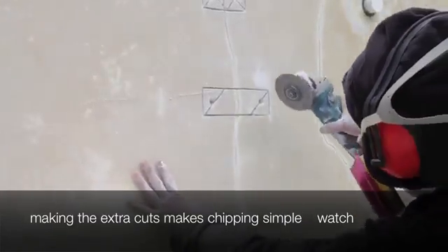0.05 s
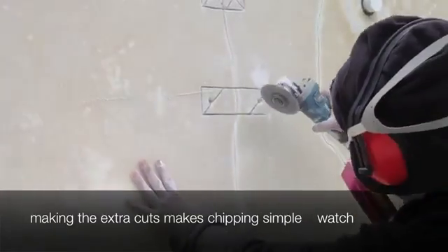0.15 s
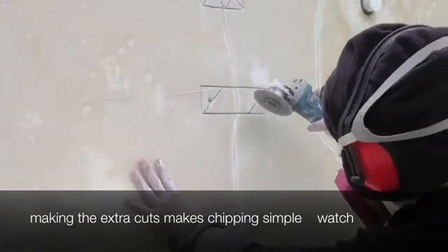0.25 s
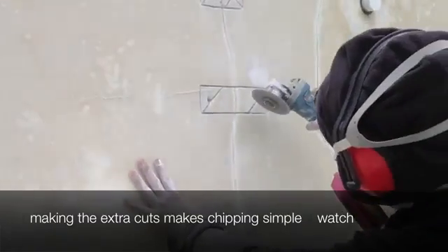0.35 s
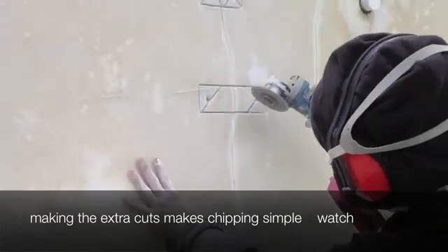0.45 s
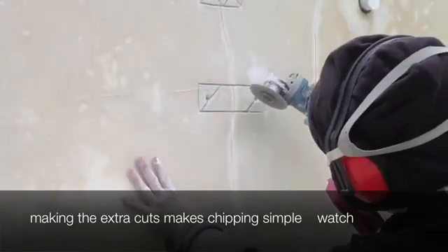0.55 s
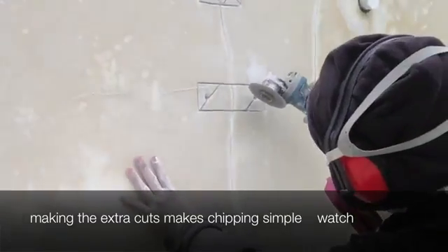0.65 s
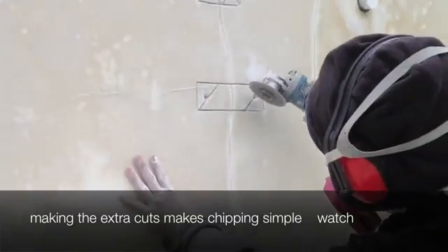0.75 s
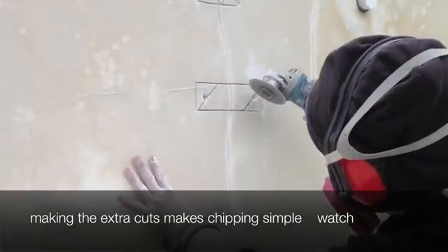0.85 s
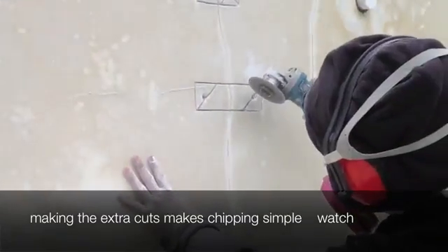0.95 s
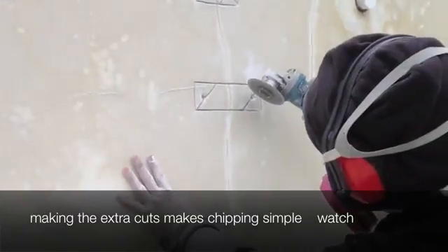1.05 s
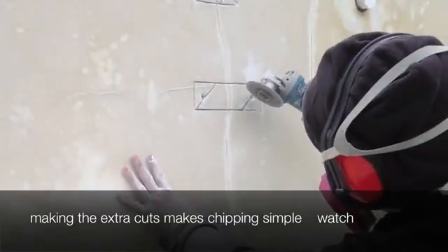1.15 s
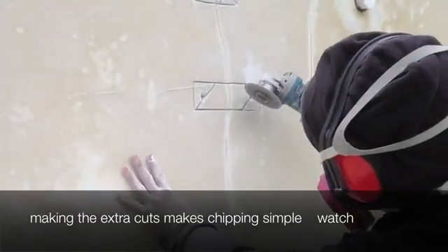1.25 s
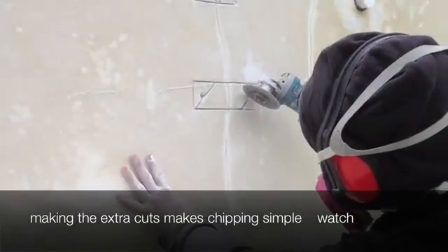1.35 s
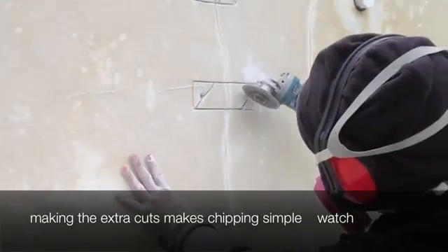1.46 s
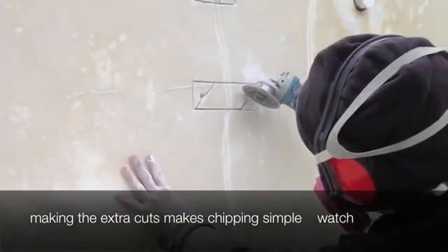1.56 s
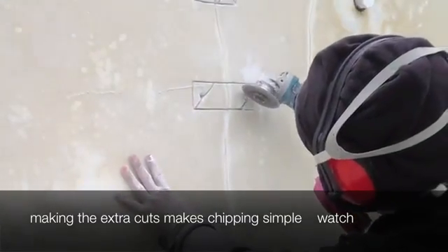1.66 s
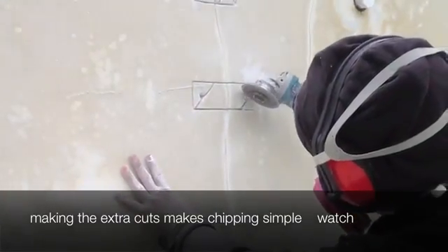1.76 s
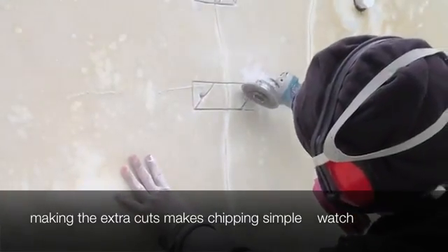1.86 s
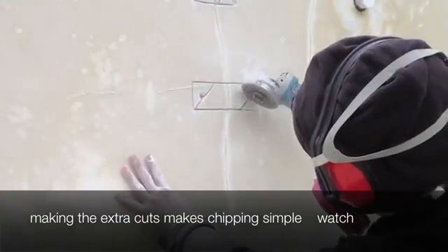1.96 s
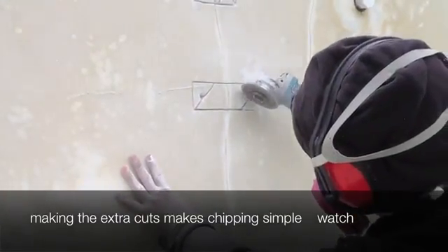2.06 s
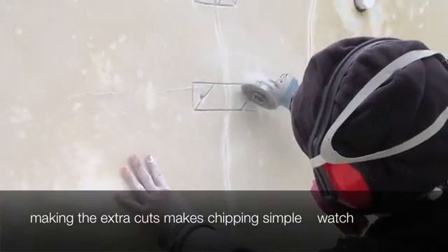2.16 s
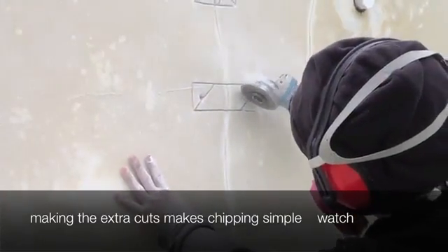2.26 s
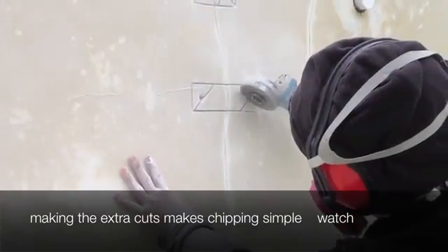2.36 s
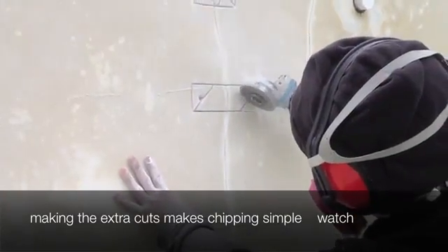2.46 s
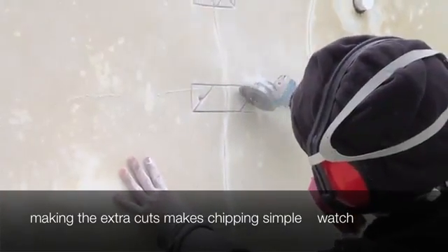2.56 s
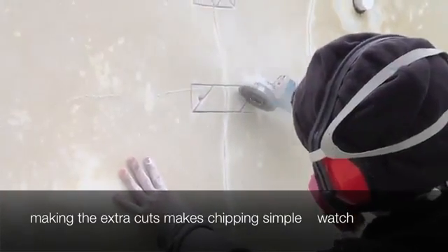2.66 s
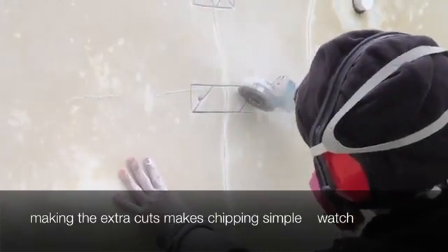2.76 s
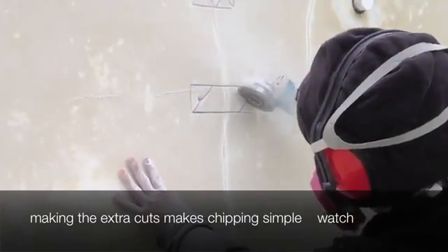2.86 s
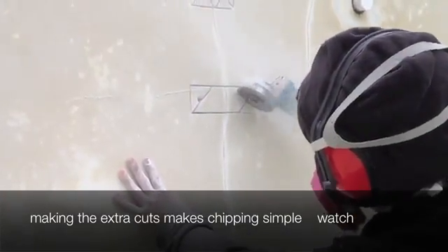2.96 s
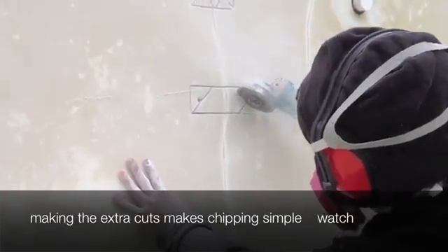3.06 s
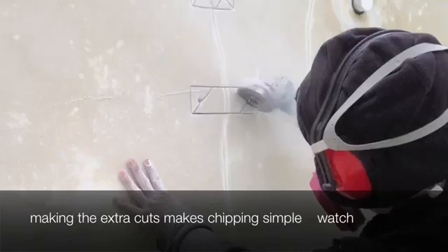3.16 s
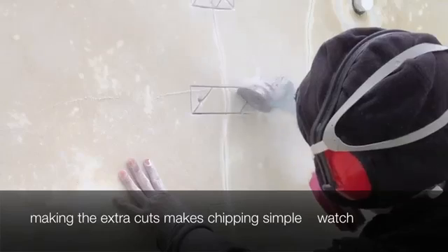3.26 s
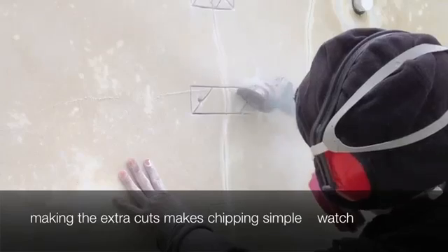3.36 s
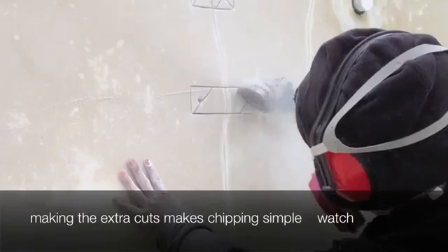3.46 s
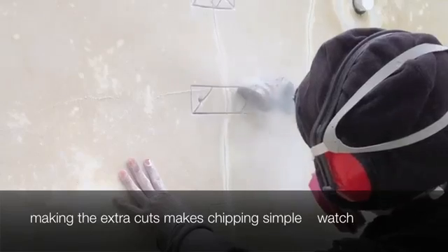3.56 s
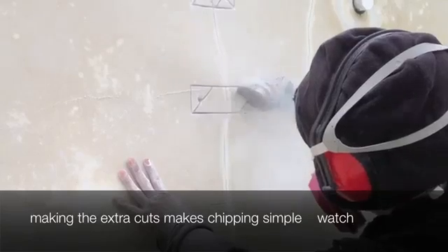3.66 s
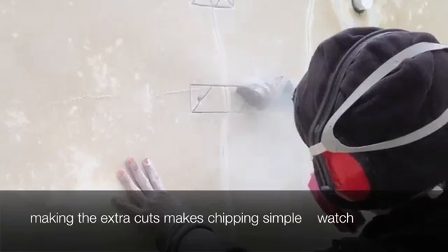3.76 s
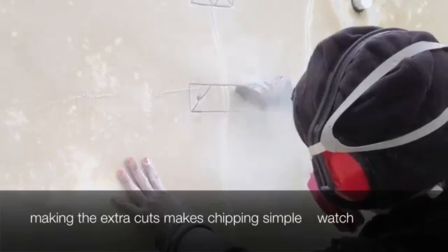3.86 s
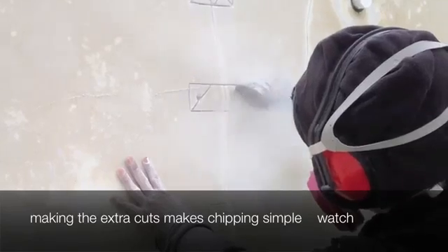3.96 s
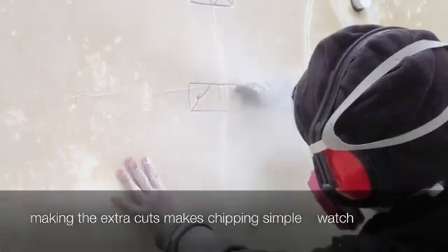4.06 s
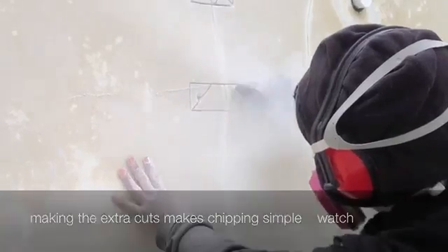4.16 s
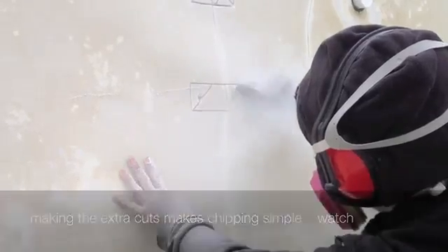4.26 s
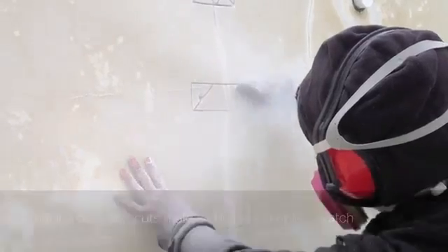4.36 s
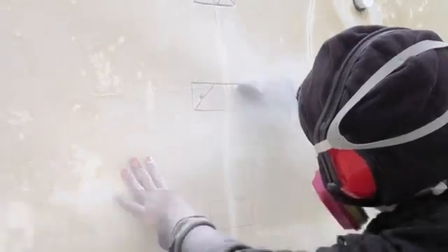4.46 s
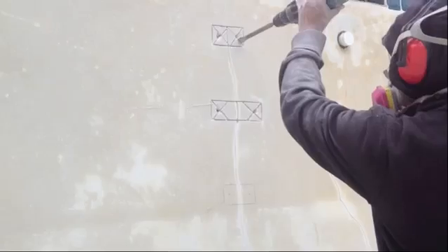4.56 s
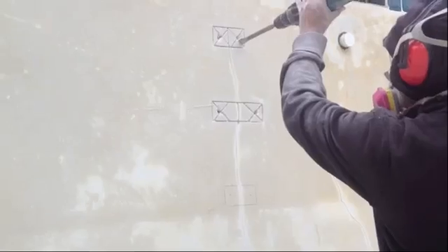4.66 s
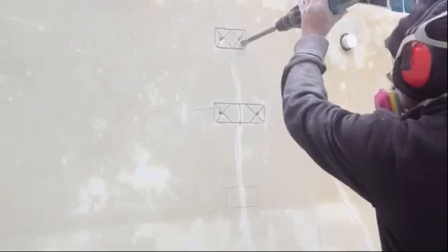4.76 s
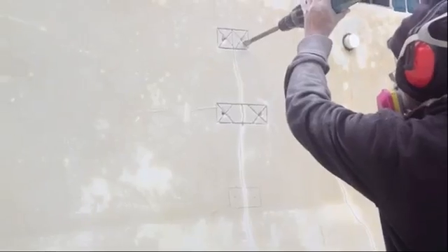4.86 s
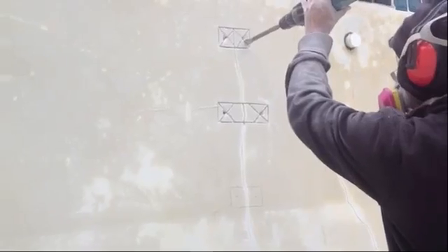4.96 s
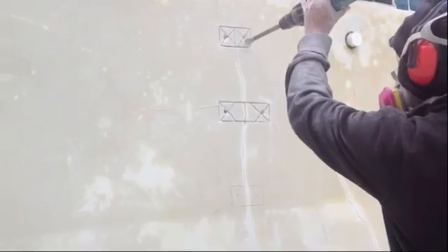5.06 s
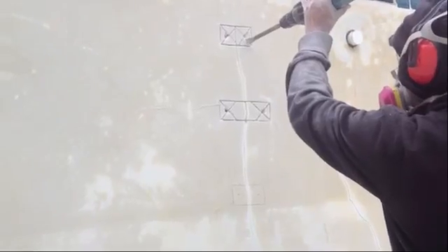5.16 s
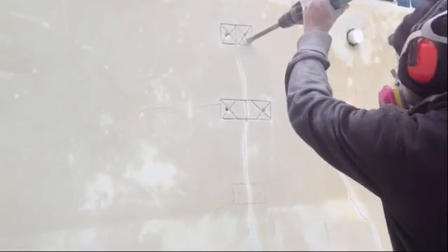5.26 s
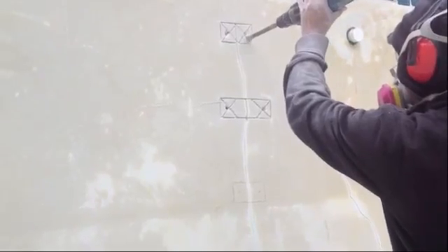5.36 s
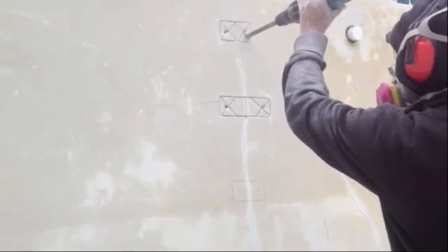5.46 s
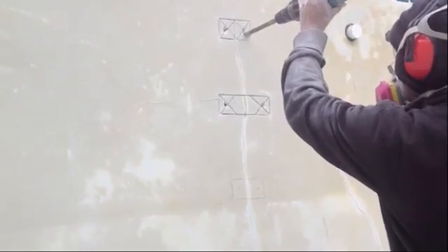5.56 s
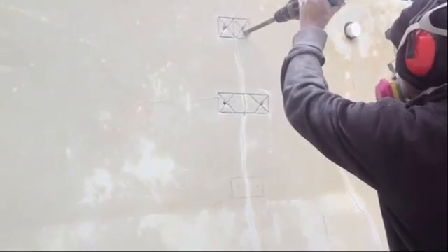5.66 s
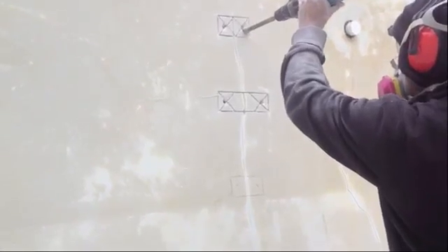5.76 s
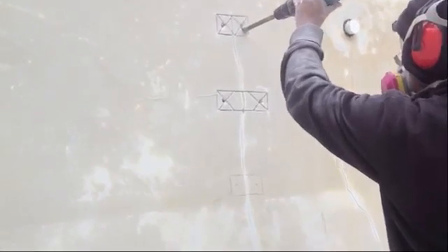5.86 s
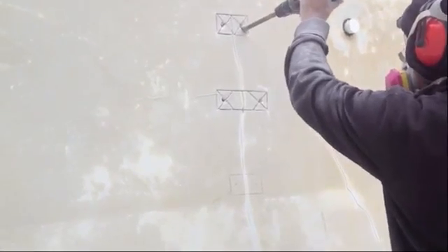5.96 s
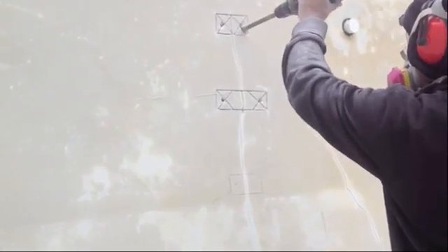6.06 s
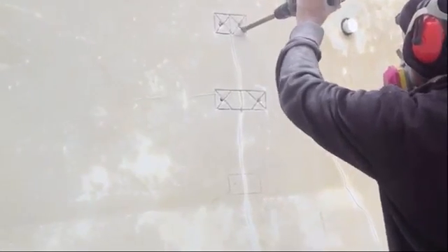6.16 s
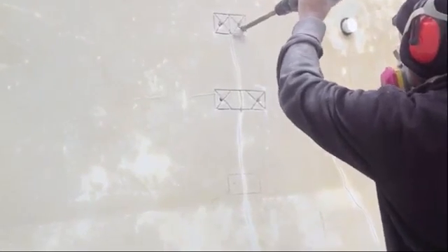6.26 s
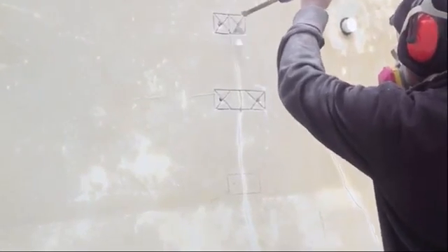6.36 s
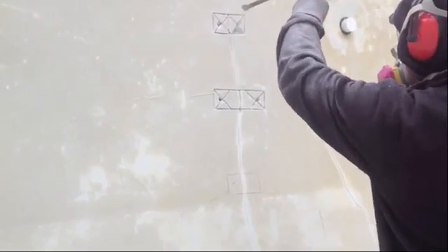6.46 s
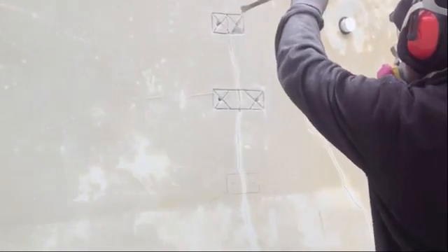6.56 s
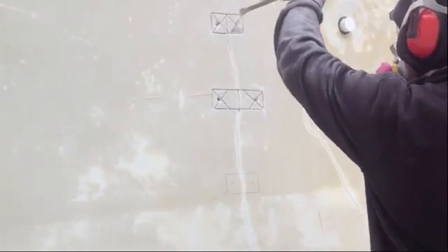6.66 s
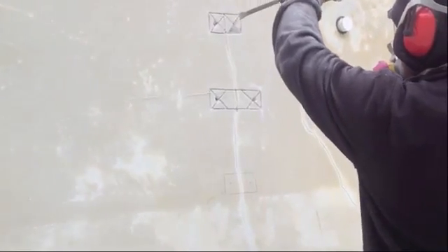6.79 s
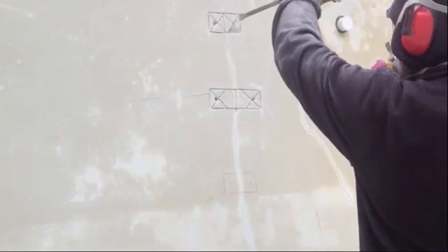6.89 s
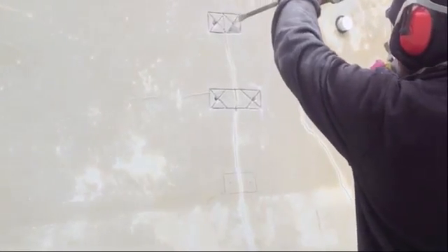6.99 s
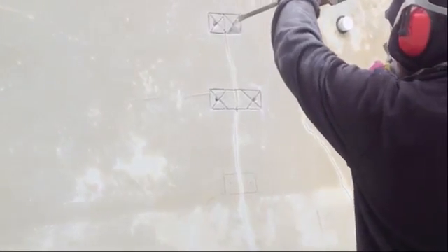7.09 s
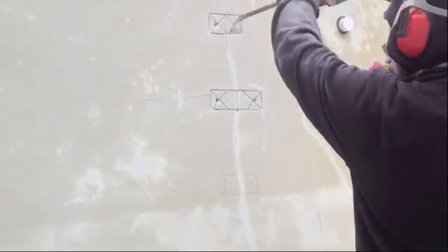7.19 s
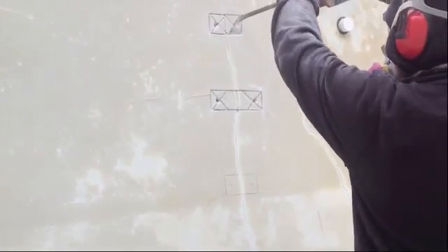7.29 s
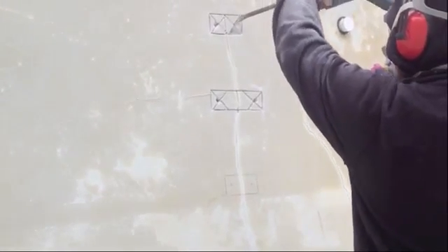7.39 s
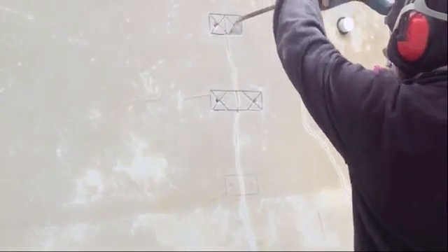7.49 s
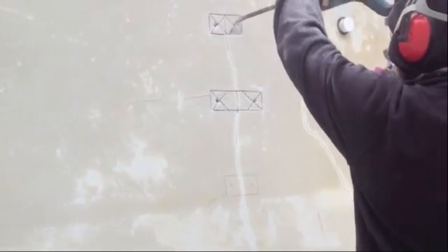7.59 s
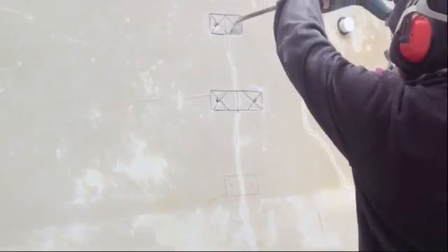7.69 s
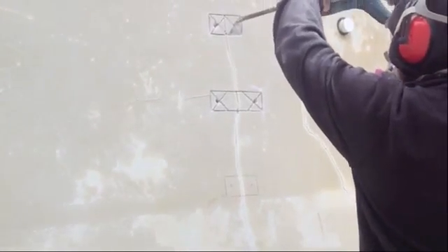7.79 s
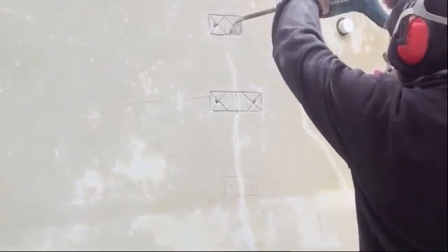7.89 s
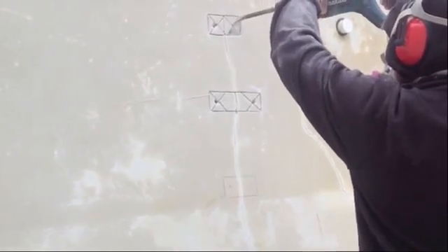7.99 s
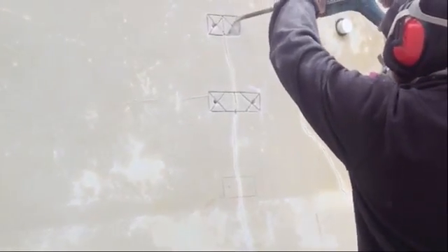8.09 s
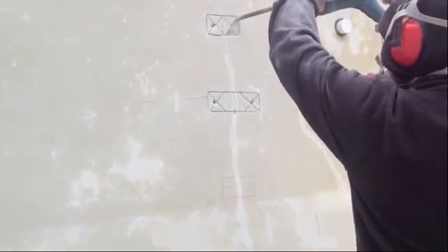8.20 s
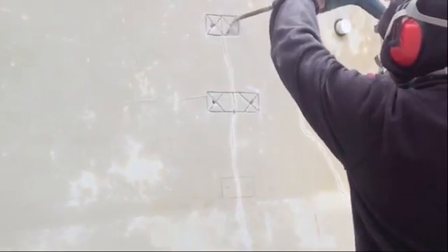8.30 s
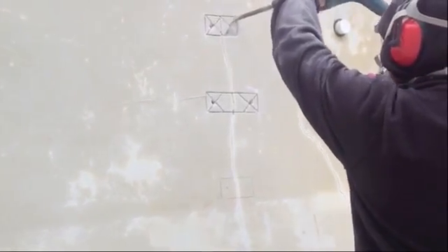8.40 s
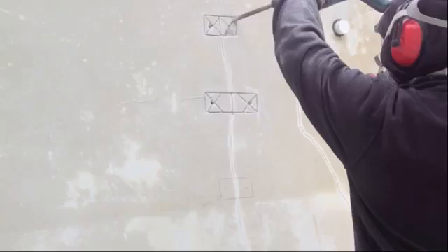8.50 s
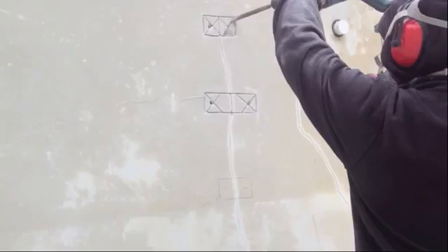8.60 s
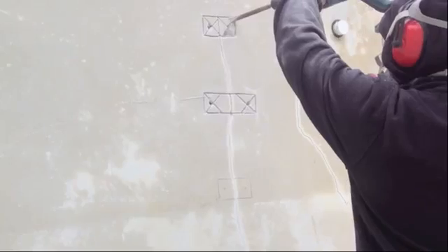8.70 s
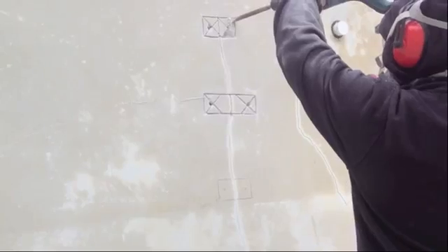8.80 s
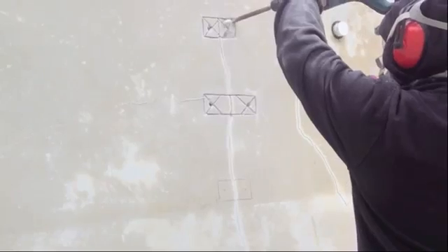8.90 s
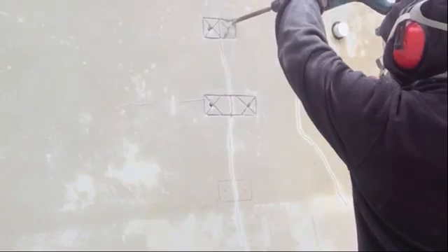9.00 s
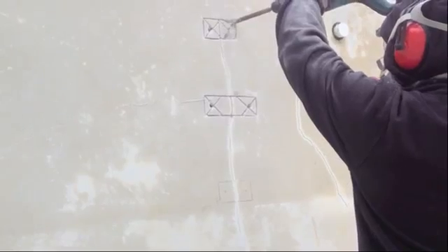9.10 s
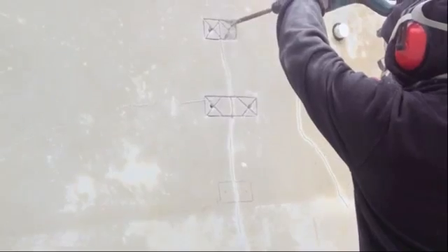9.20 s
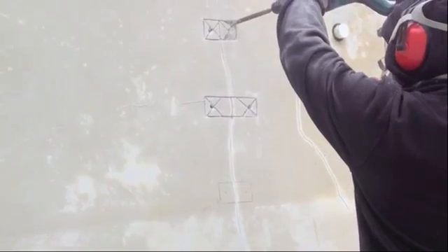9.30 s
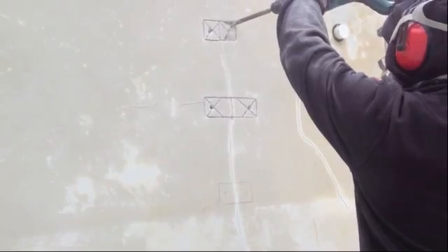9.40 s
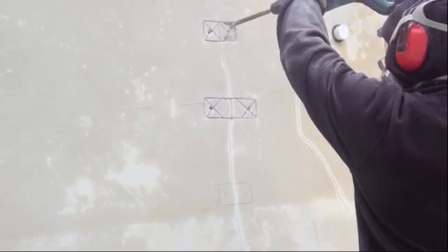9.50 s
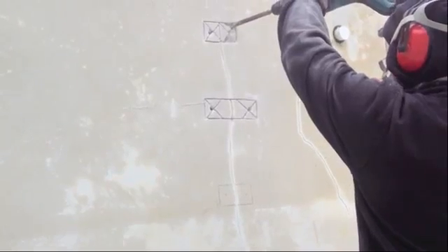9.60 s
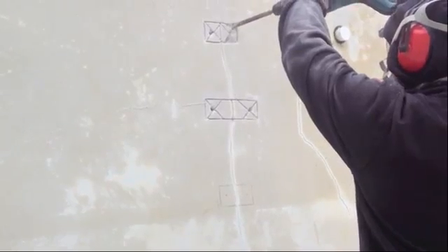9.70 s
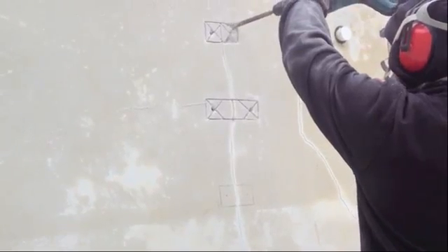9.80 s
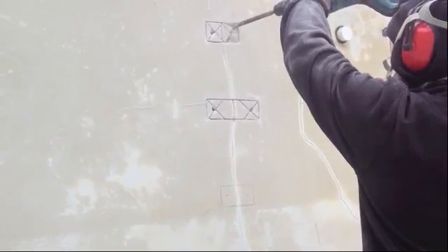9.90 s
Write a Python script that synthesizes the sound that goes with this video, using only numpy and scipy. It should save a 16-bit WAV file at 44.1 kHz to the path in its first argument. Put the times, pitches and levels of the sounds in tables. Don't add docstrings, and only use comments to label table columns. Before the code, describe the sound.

Close up in a hard, empty outdoor basin, an angle grinder rushes freely, then bites into concrete with harsh scraping and a shrill, drifting disc song. Dust thumps softly against the microphone. The sound drops away to near quiet; a rotary hammer starts, hammers rapidly, slows and coasts down. Small chips click and fall, then a second, denser burst runs to the end with a dull short echo.

```python
import sys
import numpy as np
from scipy import signal
from scipy.fft import rfft, irfft
from scipy.io import wavfile

SR = 44100
rng = np.random.default_rng(int(sys.argv[2]) if len(sys.argv) > 2 else 0)


def transcribe(signal):
    frames = np.atleast_2d(signal).T
    limited = np.clip(frames, -1, 1)
    pcm = np.round(limited * 32767).astype(np.int16)
    wavfile.write(sys.argv[1], SR, pcm)


def convert_level_to_amplitude(level_db):
    exponent = np.asarray(level_db, float) / 20
    return 10 ** exponent


N = 438354
T = np.arange(N) / SR

# time_s, level_db
FREE_LEVEL = [
    (0, -16),
    (.1, -17),
    (.7, -16),
    (1.36, -15.5),
    (1.39, -27),
    (1.7, -31),
    (3, -30.5),
    (4.48, -31),
    (4.57, -89),
]
# freq_hz, level_db
FREE_COLOUR = [(24, -89), (40, -74), (154, -26.5), (438, -21.5), (740, -14.5), (973, -14), (1100, -6),
               (1520, -8), (2390, 0), (5300, -1.5), (8110, -3), (12400, -5.5), (14400, -3.5),
               (15500, -19.5)]
# pitch_hz, width_hz, level_db
FREE_TONES = [(153, 6, -46.5), (585, 18, -37.5), (737, 16, -36), (1232, 20, -32.5), (2315, 230, -20),
              (4044, 250, -19), (6165, 50, -25.5), (6900, 30, -19), (8250, 400, -16)]
# time_s, length_s, pitch_hz, width_hz, level_db
GRAZE = (.17, 0.1, 2850, 200, -23.5)
# time_s, scrape_db, disc_song_db
CUT_LEVEL = [(1.36, -33, -37), (1.39, -25.5, -26), (1.5, -22.5, -18), (1.65, -25.5, -15), (2.2, -22.5, -13),
             (2.7, -20.5, -12.5), (3.05, -23, -12.5), (3.3, -23, -15.5), (3.9, -20.5, -13),
             (4.46, -21.5, -13.5), (4.53, -29, -23.5), (4.57, -74, -75)]
# freq_hz, level_db
SCRAPE_COLOUR = [(200, -25.5), (500, -18), (1350, -10.5), (2390, -5.5), (4070, -4.5), (6000, -4.5),
                 (9370, -3), (11000, -6), (13200, -4), (14800, -8), (15500, -28.5)]
# time_s, depth (0 to 1)
CUT_DEPTH = [
    (1.4, 0),
    (2.0, 0.19),
    (2.6, .5),
    (3.2, .75),
    (3.7, .95),
    (4.5, 0.99),
]
# shallow_hz, deep_hz, width_hz, shallow_db, halfway_db, deep_db
DISC_NOTES = [(1100, 1090, 17, -18.5, -39.5, -39), (1768, 1780, 190, -21, -12.5, -13),
              (3144, 3070, 40, -11.5, -23, -12), (5570, 5680, 150, -11, -12.5, -10),
              (6580, 6700, 150, -11.5, -6, -20.5), (7050, 7220, 80, -12.5, -11.5, -6.5),
              (7960, 7760, 78, -2.5, -9.5, -2.5), (8420, 8700, 150, -9, -5, -1.9),
              (9600, 9380, 120, -6.5, -2.5, -5), (10400, 10250, 60, -3, -14.5, -25),
              (10430, 10620, 110, -24.5, -11, -3.5), (11720, 11480, 160, -1.5, -2.5, -11.5),
              (12700, 14000, 120, -14, -12.5, -9), (14420, 13900, 220, 1, -1.5, -1)]
# time_s, level_db
DUST_LEVEL = [
    (1.62, -58),
    (1.73, -38),
    (1.9, -39.5),
    (2.4, -32.5),
    (3.4, -33.5),
    (4.45, -38),
    (4.57, -58),
]
# freq_hz, level_db
DUST_COLOUR = [(12, -50), (20, -26), (64, -28), (146, 0), (198, 0), (536, -6.5), (797, -5), (1230, -12),
               (1500, -13), (1950, -24.5), (3300, -120)]
# time_s, level_db
DUST_THUMPS = [(1.841, -18.5), (1.875, -21), (1.912, -16), (1.935, -16), (1.951, -18), (2.016, -15),
               (2.061, -22), (2.08, -21), (2.105, -18), (2.122, -20), (2.156, -24), (2.184, -26),
               (2.304, -23), (2.393, -16), (2.513, -23), (2.536, -24.5), (2.557, -20), (2.592, -21),
               (2.737, -16), (2.842, -16), (2.855, -23), (2.953, -27.5), (2.968, -21), (3.041, -25),
               (3.064, -19), (3.131, -18), (3.16, -17), (3.284, -24), (3.385, -17.5), (3.429, -17.5),
               (3.454, -21), (3.565, -20), (3.679, -18.5), (3.761, -24), (3.779, -24), (3.9, -22),
               (4.005, -16), (4.022, -19), (4.161, -24), (4.175, -26), (4.262, -28), (4.367, -28.5)]
# time_s, peak_db, ring_db (chisel ring relative to the peak)
FIRST_BLOWS = [(4.9531, -11, -27), (4.9706, -8, -33), (4.9864, -5.5, -32), (5.0023, -7.5, -25),
               (5.015, -2.5, -27), (5.0295, -4, -17), (5.0453, -11.5, -7), (5.0624, -7, -11),
               (5.0803, -14, 2), (5.0974, -18, -12), (5.117, -4.5, -15), (5.136, -10.5, -12),
               (5.1547, -11, -8), (5.1757, -6, -8), (5.1958, -7, -4), (5.214, -7.5, -10), (5.2298, -17, 2),
               (5.2472, -10, -5), (5.2648, -11, -14), (5.2822, -7, -6), (5.301, -12, -10),
               (5.3216, -9.5, 5), (5.3414, -14, -14), (5.362, -7, -11), (5.3832, -12, -8),
               (5.404, -6.5, -12), (5.4282, -10.5, -5), (5.4506, -10, -6), (5.4763, -16, -6),
               (5.5007, -8, -10), (5.5276, -7, -11), (5.5563, -8.5, -17), (5.585, -7, -18),
               (5.6141, -7.5, -17), (5.648, -6, -30), (5.6794, -12.5, -19), (5.704, -11.5, -28),
               (5.7393, -20, -28), (5.7487, -15, -27), (5.7764, -12, -29), (5.789, -19, -26),
               (5.818, -16, -28), (5.8611, -11.5, -33), (5.9003, -15, -30), (5.9253, -33, -22),
               (5.948, -14.5, -29), (5.973, -23, -22), (5.9983, -19, -25), (6.027, -19.5, -19),
               (6.055, -21, -25), (6.0839, -20.5, -20), (6.1154, -20, -26), (6.1494, -21, -17),
               (6.1816, -24, -25), (6.219, -27, 3.5), (6.255, -31, -6), (6.3039, -26, -10),
               (6.3378, -39, -9), (6.4063, -35, -13), (6.4475, -38, -27), (6.5533, -43, -18)]
# time_s, peak_db, ring_db (chisel ring relative to the
SECOND_BLOWS = [(7.8265, -26, -27), (7.8416, -16.5, -9), (7.8727, -2.5, -11), (7.8956, -7, -4),
                (7.9168, -4, -6), (7.9326, -9, -8), (7.9516, -7, -10), (7.967, -8.5, -7),
                (7.9862, -6.5, -6), (8.0044, -7, -12), (8.022, -9, -8), (8.063, -9.5, -8.5),
                (8.0843, -7.5, -10), (8.104, -9, -2.5), (8.1256, -9.5, -3), (8.15, -11, -6),
                (8.174, -9, -8), (8.199, -9, -6.5), (8.2249, -10, -5), (8.2519, -9.5, -5),
                (8.2806, -10, -5), (8.3093, -16, -4), (8.3395, -8, -15), (8.3714, -12, -20),
                (8.394, -19, -19), (8.4085, -13, -15), (8.44, -10, -18), (8.4644, -20, -22),
                (8.4772, -14, -14), (8.5043, -15, -28), (8.5164, -13, -18), (8.5458, -13.5, -17),
                (8.5942, -7, -15), (8.6191, -4, -10), (8.639, -3, -9), (8.658, -9.5, -7), (8.6756, -4, -11),
                (8.6896, -7, -4), (8.7044, -18.5, -7.5), (8.7243, -5, -5), (8.7412, -11, -19),
                (8.7777, -5.5, -11), (8.7954, -13, -4), (8.815, -6.5, -6), (8.8351, -10.5, -12),
                (8.857, -5, -10), (8.878, -9, -6.5), (8.9005, -3, -13), (8.9229, -4.5, -16),
                (8.9448, -7, -18), (8.9654, -5, -6), (8.9832, -2, -21.5), (9, -3.5, -14.5), (9.016, -10, 3),
                (9.0368, -6.5, -11), (9.056, -4, -17), (9.075, -5.5, -15), (9.0955, -6, -7),
                (9.117, -8, -21), (9.1384, -6, -18), (9.1605, -5.5, -16), (9.1838, -5, -16),
                (9.208, -5.5, -18), (9.234, -7, -13), (9.2576, -2, -27), (9.284, -3.5, -17),
                (9.311, -4, -17), (9.3366, -4.5, -22), (9.3624, -4, -24), (9.394, -6.5, -18),
                (9.4246, -5, -19), (9.457, -8.5, -27), (9.4866, -9, -21), (9.5175, -3, -22.5),
                (9.5395, -2, -14), (9.5568, -2.5, -5), (9.5763, -6, -11), (9.6078, -7.5, -9),
                (9.6243, -2, -8), (9.6382, -3.5, -18), (9.6667, -3, -9), (9.6817, -7, -18),
                (9.6955, -7, -3.5), (9.7368, -9, -3), (9.7496, -7, -19), (9.777, -16, -1),
                (9.8211, -9.5, -9), (9.8326, -7.5, -1), (9.8454, -14, -7), (9.902, -11, -10),
                (9.913, -20, 4),
                (8.7567, -9, -7), (9.592, -5.5, -17), (9.6516, -10.5, -14), (9.7087, -0.5, -15),
                 (9.7227, -12.5, -3), (9.7657, -16, 9.5), (9.792, -7, -6), (9.8058, -18, -6),
                 (9.86, -15.5, 8.5), (9.873, -11, -3), (9.8872, -5, -9), (9.9257, -6, -6)]
# freq_hz, level_db
CRACK_COLOUR = [(59, -56), (100, -69), (530, -21.5), (1110, -9), (1730, 5.5), (2810, -7.5), (3850, -5.5),
                (6260, 7), (8580, -5.5), (9740, -15), (11100, -31), (12300, -3), (15500, -23)]
# pitch_hz, level_db, t60_s (time to fall 60 dB)
HOUSING_NOTES = [(295.5, -20, 0.038), (636, -16.5, 0.048), (1225, -20, 0.026), (1690, -10.5, 0.019),
                 (2790, -8, 0.026), (5260, -17, 0.018), (6560, -17.5, 0.0068)]
# pitch_hz, level_db, t60_s
CHISEL_NOTES = [
    (12100, -6.5, 0.047),
    (12230, -1.5, .009),
    (12700, -4.5, 0.0064),
    (11470, -9, 0.0066),
    (13340, -9.5, .006),
    (15360, -18, .015),
]
# time_s, dull_db, bright_db
MOTOR_LEVEL = [(4.6, -66, -63), (4.66, -56, -53), (4.83, -62, -58.5), (4.87, -39, -39.5),
               (4.92, -26.5, -27.5), (4.97, -23, -19), (5.07, -21.5, -19.5), (5.1, -28, -25),
               (5.52, -29.5, -28), (5.75, -33.5, -33), (6.04, -43.5, -44), (6.3, -47.5, -49),
               (6.49, -54.5, -59), (6.82, -68.5, -68), (7.795, -64, -65), (7.805, -54, -51),
               (7.85, -35, -40), (7.9, -24, -22.5), (8.0, -27, -24.5), (8.15, -28.5, -28),
               (8.44, -35.5, -36), (8.58, -35, -35), (8.64, -28, -27), (8.78, -26.5, -25.5),
               (8.94, -29, -28.5), (9.0, -26, -23.5), (9.25, -29, -27.5), (9.5, -32, -32.5),
               (9.58, -30, -23.5), (9.72, -24, -22), (9.94, -25, -23.5)]
# freq_hz, level_db
MOTOR_COLOUR = [(35, -70), (60, -96), (220, -19), (453, -18), (705, -4.5), (953, -7.5), (1200, 0.5),
                (1380, -3), (1740, 4), (3270, 3.5), (6560, -1), (8670, -8.5), (9970, -18), (12300, -13.5),
                (15500, -16.5)]
# time_s, peak_db, pitch_hz
CHIP_FALLS = [(4.658, -31.5, 3910), (4.686, -36, 2070), (4.705, -37, 1910), (4.8, -40, 2040),
              (4.84, -29.5, 2640), (6.682, -36, 7590), (6.715, -20, 4250), (6.75, -32, 4670),
              (6.804, -35, 4640), (6.812, -35, 3870), (6.883, -48, 4480), (6.891, -9, 4600),
              (6.894, -15, 5000), (6.922, -28, 5450), (6.943, -28, 7570), (6.985, -17, 4460),
              (7.002, -8.5, 1370), (7.071, -21.5, 6700), (7.133, -14, 3780), (7.26, -28, 2120),
              (7.278, -20, 12600), (7.33, -13.5, 4350), (7.454, -23.5, 1800), (7.465, -19.5, 4530),
              (7.575, -31, 3980), (7.608, -27, 4700), (7.628, -33, 4800), (7.715, -31, 4000),
              (7.737, -38, 4050), (7.764, -29.5, 2600), (7.804, -37, 6050), (7.827, -33, 12500)]
# time_s, level_db
AIR_LEVEL = [(4.56, -85), (4.62, -66), (4.7, -55.5), (5.3, -55), (6.8, -61), (7.1, -60), (7.5, -52),
             (7.8, -64)]
# freq_hz, level_db
AIR_COLOUR = [(18, -48), (30, -32.5), (219, 8), (945, -4), (2240, -1), (3150, -6), (5040, 4.5), (8280, -18),
              (9940, -34), (12600, -25), (15500, -26)]


def rms_one(x):
    return x / np.sqrt(np.mean(x ** 2) + 1e-20)


def in_time(rows):
    times, *columns = np.transpose(rows)
    return [np.interp(T, times, column, left=-120, right=-120) for column in columns]


def coloured(spectrum):
    hz = np.fft.rfftfreq(N, 1 / SR) + 1
    table_hz, table_db = np.transpose(spectrum)
    gain = convert_level_to_amplitude(np.interp(np.log(hz), np.log(table_hz), table_db))
    return rms_one(irfft(rfft(rng.standard_normal(N)) * gain, N))


def drift(rate_hz):
    r = np.exp(-2 * np.pi * rate_hz / SR)
    noise = rng.standard_normal(N + SR)
    return rms_one(signal.lfilter([1], [1, -2 * r, r * r], noise)[SR:])


def sung(hz, width_hz):
    phase = 2 * np.pi * np.cumsum(hz * np.ones(N)) / SR
    return drift(width_hz) * np.cos(phase) + drift(width_hz) * np.sin(phase)


def ring(x, hz, t60_s):
    r = convert_level_to_amplitude(-60 / (t60_s * SR))
    w = 2 * np.pi * hz / SR
    return signal.lfilter([0, np.sin(w)], [1, -2 * r * np.cos(w), r * r], x + 1e-18)


def puff(clicks, rise_s, fall_s):
    t = np.arange(SR // 10) / SR
    shape = (1 - np.exp(-t / rise_s)) ** 3 * np.exp(-t / fall_s)
    return np.maximum(signal.oaconvolve(clicks, shape / shape.max())[:N], 0)


def free_running():
    tones = np.zeros(N)
    for hz, width_hz, db in FREE_TONES:
        tones += convert_level_to_amplitude(db + 3 + 2.3 * drift(3.1)) * sung(hz, width_hz)
    rush = coloured(FREE_COLOUR) * convert_level_to_amplitude(0.8 * drift(40))
    return convert_level_to_amplitude(in_time(FREE_LEVEL)[0]) * (rush + tones)


def graze():
    at_s, length_s, hz, width_hz, db = GRAZE
    return convert_level_to_amplitude(db) * np.exp(-((T - at_s) / length_s) ** 2) * sung(hz, width_hz)


def cutting():
    scrape_db, song_db = in_time(CUT_LEVEL)
    depth = np.interp(T, *np.transpose(CUT_DEPTH))
    chatter = drift(55)
    wander_hz = 40 * drift(4)
    song = np.zeros(N)
    for shallow_hz, deep_hz, width_hz, *depth_dbs in DISC_NOTES:
        hz = shallow_hz + (deep_hz - shallow_hz) * depth + wander_hz
        db = np.interp(depth, [0, 0.5, 1], depth_dbs) + 1.9 * drift(7.3)
        song += convert_level_to_amplitude(db) * sung(hz, 0.92 * width_hz)
    scrape = convert_level_to_amplitude(scrape_db + 3.5 + 1.54 * chatter) * coloured(SCRAPE_COLOUR)
    return scrape + convert_level_to_amplitude(song_db - 1.5 + 0.72 * chatter) * rms_one(song)


def grinder():
    notch_hz, notch_width_hz = 12360, 800
    notch = signal.iirnotch(notch_hz, notch_hz / notch_width_hz, SR)
    return signal.lfilter(*notch, free_running() + graze() + cutting())


def dust_buffet():
    level = convert_level_to_amplitude(in_time(DUST_LEVEL)[0])
    times, thump_db = np.transpose(DUST_THUMPS)
    chance = rng.random(N) < 70 / SR
    puffs = level * chance * convert_level_to_amplitude(1.5 + 2.2 * rng.standard_normal(N))
    puffs[(times * SR).astype(int)] = convert_level_to_amplitude(thump_db - 4.5)
    return (0.61 * level + puff(puffs, 0.0009, 0.0037)) * coloured(DUST_COLOUR)


def chisel(strikes):
    shock = puff(strikes, 0.00069, 0.00086)
    shock = shock + convert_level_to_amplitude(-23) * puff(strikes, 0.0034, 0.02)
    out = np.zeros(N)
    for hz, db, t60_s in CHISEL_NOTES:
        out += convert_level_to_amplitude(db) * ring(shock * rng.standard_normal(N), hz, t60_s)
    return out


def hammer():
    times, peak_db, ring_db = np.transpose(FIRST_BLOWS + SECOND_BLOWS)
    at = ((times - 0.0007) * SR).astype(int)
    hits, strikes = np.zeros(N), np.zeros(N)
    hits[at] = convert_level_to_amplitude(peak_db)
    strikes[at] = convert_level_to_amplitude(peak_db + ring_db)
    crack = convert_level_to_amplitude(-9) * puff(hits, 0.0007, 0.0010) * coloured(CRACK_COLOUR)
    rattle = convert_level_to_amplitude(-22) * puff(hits, 0.0023, 0.0093) * coloured(MOTOR_COLOUR)
    thud = sum(convert_level_to_amplitude(db) * ring(hits, hz, t60_s) for hz, db, t60_s in HOUSING_NOTES)
    return convert_level_to_amplitude(0.3) * crack + rattle + convert_level_to_amplitude(-12.5) * thud + convert_level_to_amplitude(-12) * chisel(strikes)


def hammer_motor():
    dull_db, bright_db = in_time(MOTOR_LEVEL)
    noise = coloured(MOTOR_COLOUR) * convert_level_to_amplitude(3.1 * drift(120))
    split_hz = 4000
    dull = signal.sosfilt(signal.butter(2, split_hz, fs=SR, output="sos"), noise)
    bright = signal.sosfilt(signal.butter(2, split_hz, "high", fs=SR, output="sos"), noise)
    return convert_level_to_amplitude(dull_db + 4.5) * rms_one(dull) + convert_level_to_amplitude(bright_db + 4.5) * rms_one(bright)


def gear_whine():
    level_db = np.interp(T, [4.86, 4.92, 4.96, 5.0], [-55, -27, -33, -70], left=-120, right=-120)
    hz = np.interp(T, [4.87, 4.96], [6300, 8000])
    return convert_level_to_amplitude(level_db) * sung(hz, 150)


def falling_chips():
    out = np.zeros(N)
    t = np.arange(2000) / SR
    for start_s, peak_db, hz in CHIP_FALLS:
        loudness = np.exp(-t / 0.00023) + 0.18 * convert_level_to_amplitude(-60 * t / 0.02)
        burst = rng.standard_normal(len(t)) * loudness
        edges_hz = [hz / 1.78, min(hz * 1.61, 0.45 * SR)]
        tick = signal.sosfilt(signal.butter(3, edges_hz, "band", fs=SR, output="sos"), burst)
        i = int(start_s * SR)
        out[i:i + len(t)] += convert_level_to_amplitude(peak_db) * tick / np.abs(tick).max()
    return out


def basin(x):
    t = np.arange(SR // 2) / SR
    tail = rng.standard_normal(len(t)) * convert_level_to_amplitude(-60 * t / 0.48)
    tail = tail * (t > 0.004)
    tail = signal.sosfilt(signal.butter(2, [500, 6000], "band", fs=SR, output="sos"), tail)
    return signal.fftconvolve(x, tail / np.linalg.norm(tail))[:N]


def open_air():
    last_s, last_db = AIR_LEVEL[-1]
    level_db = np.where(T > last_s, last_db, in_time(AIR_LEVEL)[0])
    return convert_level_to_amplitude(level_db + 1.5 * drift(12.5)) * coloured(AIR_COLOUR)


def scene():
    blows, falls = hammer(), falling_chips()
    echo = convert_level_to_amplitude(-10) * basin(blows + convert_level_to_amplitude(-10.5) * falls)
    heard = grinder() + blows + hammer_motor() + gear_whine() + falls + echo
    bass_cut = signal.butter(4, 137, "high", fs=SR, output="sos")
    mono = signal.sosfilt(bass_cut, heard) + dust_buffet() + open_air()
    return np.stack([mono, mono])


def roll_off(x):
    return signal.sosfilt(signal.butter(12, 16320, fs=SR, output="sos"), x)


def record(dry):
    rounded = 1.16 * np.tanh(dry / 1.238)
    top_cut = signal.cheby2(12, 28, 15600, fs=SR, output="sos")
    return roll_off(signal.sosfilt(top_cut, rounded))


dry = scene()
out = record(dry)
transcribe(out)
```